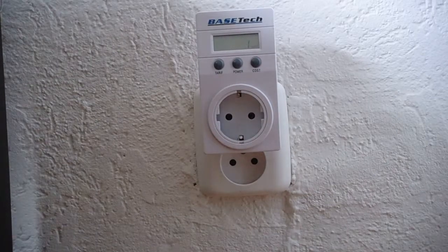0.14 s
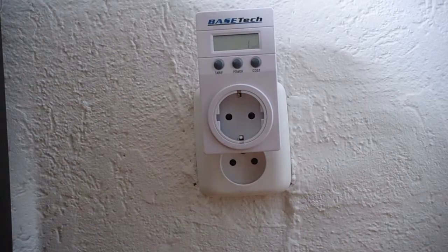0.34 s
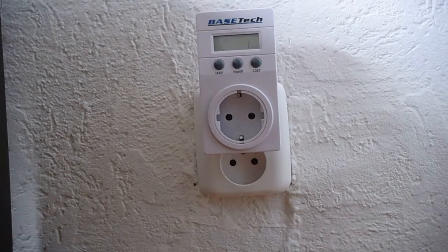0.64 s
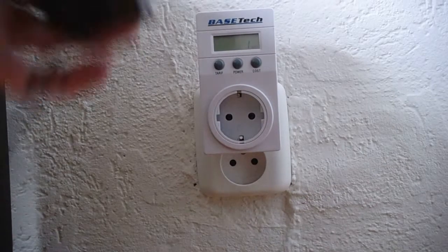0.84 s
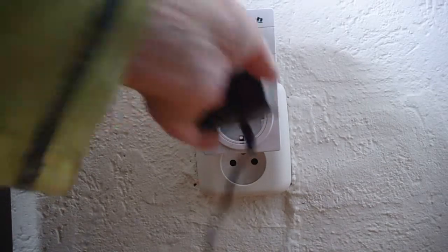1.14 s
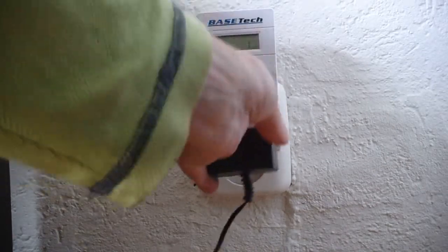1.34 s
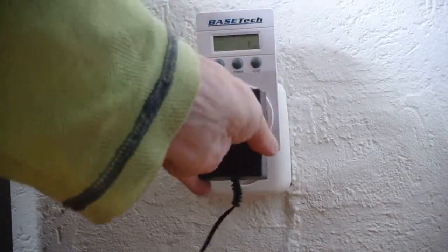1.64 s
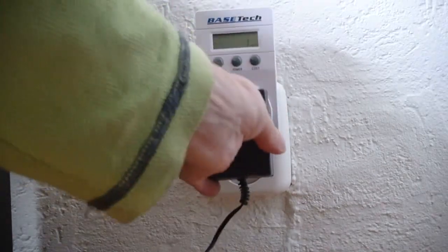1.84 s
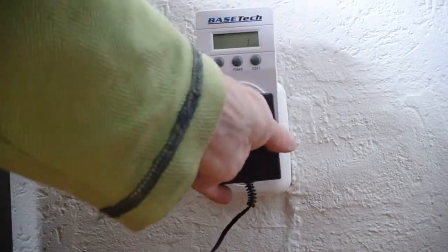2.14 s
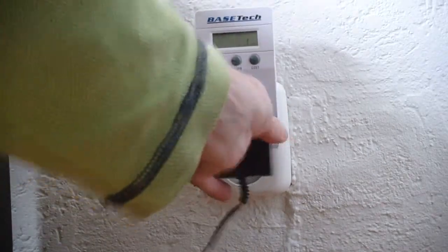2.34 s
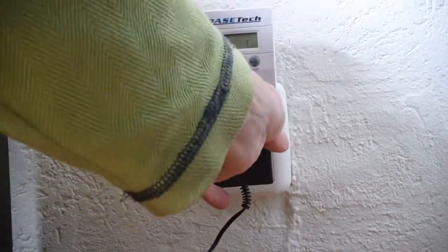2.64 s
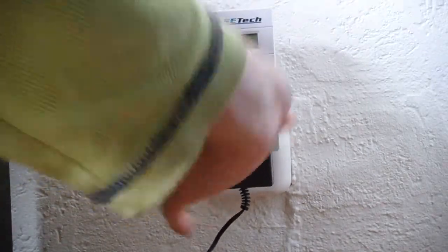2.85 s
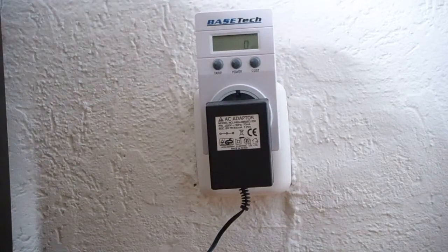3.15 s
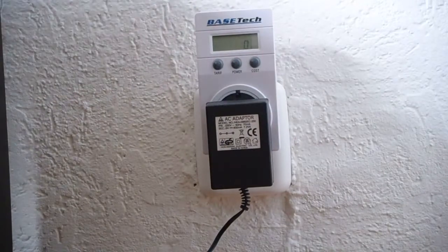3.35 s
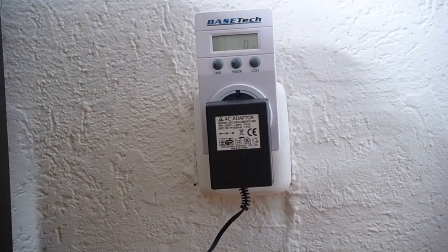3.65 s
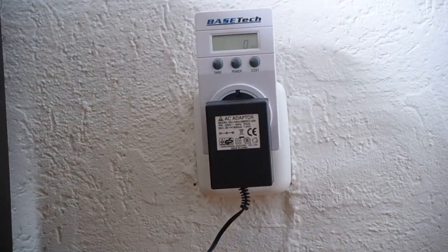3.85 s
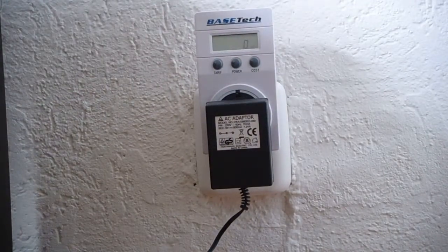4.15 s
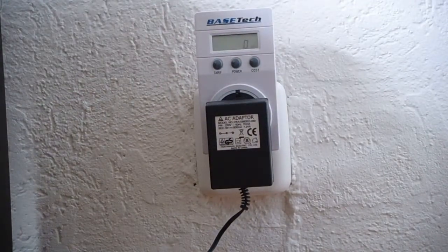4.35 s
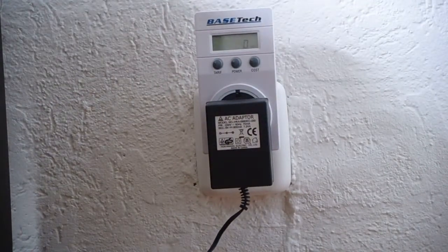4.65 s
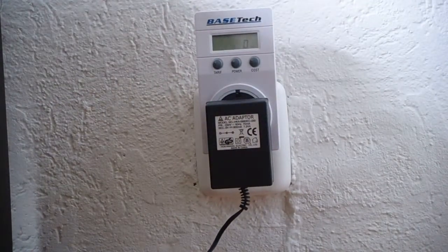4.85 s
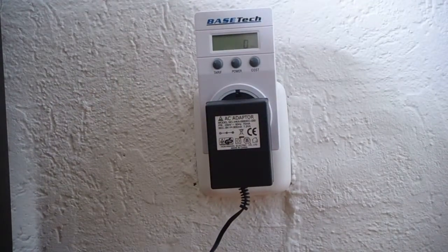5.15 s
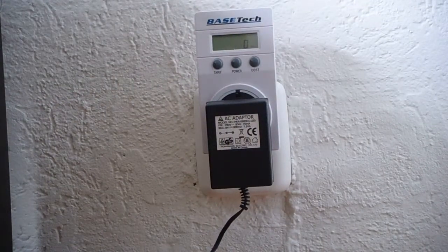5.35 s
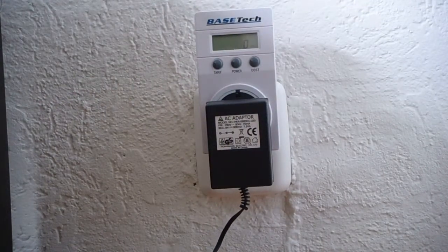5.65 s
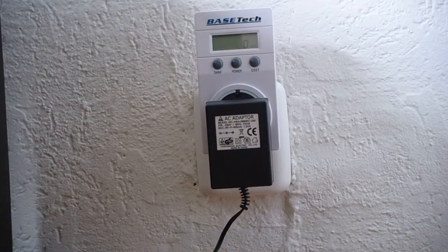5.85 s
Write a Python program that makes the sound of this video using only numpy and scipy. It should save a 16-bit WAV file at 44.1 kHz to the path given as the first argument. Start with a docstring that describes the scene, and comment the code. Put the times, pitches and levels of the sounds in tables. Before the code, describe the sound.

A small room with a short tail, recorded close by two microphones over steady soft rumble and hiss. Cloth rubs gently from the start; at 0.3 to 0.5 s come plastic clicks, the sharpest at 0.4, with a low thud beneath. Lighter, brighter clicks and sleeve rustle run from 0.8 to 1.4 s. At 1.6 s the plug scrapes briefly into the socket, with small clicks after it; at about 2.35 s a stronger double crunch seats it. Two small high clicks follow at 2.76 s, then near quiet. From 3.3 s there are faint clicks, with dull thuds around 3.8 to 4.3 s, soft rubbing and tiny creaks. A finger taps the camera at 4.8 s and more weakly near 5.3 s. Around 5.45 s something slides in groaning, hissing jerks. From 5.78 s a hard object is put down nearby: light touches, loud woody clacks at 5.84 s, smaller knocks and a fading rattle.

```python
"""Small room, close to the camera: a sleeve rubs (noise of tiny slips), a gripped plastic power adapter creaks and
clicks (noise bursts, ringing modes), a footstep thuds (low modes), two stick-slip scrapes push it into a wall socket.
Then more thuds, fingers tapping the camera (tick and case modes), a slide in jerks (groan and hiss), and nearby a
hard object put down with knocks (clack, crack, board modes) and a rattle (decaying random ticks).
Throughout, two closely spaced microphones hear the room's tail and rumble over their own hiss (filtered noise)."""
import sys
import numpy as np
from scipy import signal
from scipy.fft import rfft, irfft
from scipy.io import wavfile

SR = 44100
rng = np.random.default_rng(int(sys.argv[2]) if len(sys.argv) > 2 else 0)


def log_audio(samples):
    """Write samples as a 16-bit WAV file to the path given in sys.argv[1]."""
    # one column per channel
    frames = np.atleast_2d(samples).T
    # limit to full scale, then quantise
    limited = np.clip(frames, -1, 1)
    pcm = np.round(limited * 32767).astype(np.int16)
    wavfile.write(sys.argv[1], SR, pcm)


N = 264600
TIME = np.arange(N) / SR  # s from the start of the scene
AGE = TIME[:SR // 2]  # s from the start of one sound


def undb(db):
    """Decibels to amplitude gain."""
    return 10 ** (np.asarray(db) / 20)


def unit(x):
    """Scale to rms 1."""
    return x / np.sqrt(np.mean(x ** 2))


def onset_level(x, db):
    """Scale a hit so that its first hundredth of a second has this rms level."""
    onset_rms = np.sqrt(np.mean(x[:SR // 100] ** 2))
    return x * undb(db) / onset_rms


def add(track, s, sound):
    """Mix a sound in at a time in seconds."""
    i = int(s * SR)
    track[i:i + len(sound)] += sound[:N - i]


def filt(x, hz, kind, order=2):
    """Butterworth filter."""
    return signal.sosfilt(signal.butter(order, hz, kind, fs=SR, output="sos"), x)


def colour(x, points, size=2048):
    """Causal filter with a (f/Hz, level/dB) response, built from its cepstrum."""
    hz, db = np.transpose(points)
    bins_hz = np.arange(size // 2 + 1) * SR / size
    gain = undb(np.interp(np.log(bins_hz + 1), np.log(hz), db))
    cepstrum = irfft(np.log(gain))
    # folding the cepstrum gives minimum phase
    cepstrum[1:size // 2] *= 2
    cepstrum[size // 2 + 1:] = 0
    impulse = irfft(np.exp(rfft(cepstrum)))
    return signal.fftconvolve(x, impulse)[:len(x)]


def fade(t60):
    """Exponential decay by 60 dB in t60 seconds."""
    return np.exp(-np.log(1000) * AGE / t60)


def burst(t60):
    """A dense cluster of short modes: decaying noise."""
    return rng.standard_normal(len(AGE)) * fade(t60)


def ring(modes, scatter_db=2):
    """Damped modes; each point of contact gives them other phases and strengths."""
    out = np.zeros(len(AGE))
    for hz, db, t60 in modes:
        strength = undb(db + scatter_db * rng.standard_normal())
        out += strength * fade(t60) * np.sin(2 * np.pi * (hz * AGE + rng.random()))
    return out


def grate(slips, t60):
    """Every slip releases its own brief burst of noise; overlapping bursts add in power."""
    power = signal.lfilter([1], [1, -fade(t60)[1] ** 2], slips ** 2 + 1e-18)
    return np.sqrt(power) * rng.standard_normal(len(slips))


def friction(points, rate, spread_db, flutter_db):
    """Many tiny slips (rate per s) of uneven size, coming in flurries; rms 1."""
    sizes = undb(spread_db * np.minimum(rng.exponential(size=N), 4))
    slips = (rng.random(N) < rate / SR) * sizes
    knots = np.linspace(0, TIME[-1], 300)
    flurry = np.interp(TIME, knots, rng.standard_normal(len(knots)))
    noise = grate(slips * undb(flutter_db * flurry), t60=.004)
    return unit(colour(noise, points))


def strokes(rows):
    """Two layers' gains: each stroke swells and dies away exponentially; overlapping strokes add in power."""
    power = np.zeros((2, N))
    for s, rise_s, fall_s, low_db, hiss_db in rows:
        shape = undb(-20 * np.maximum((s - TIME) / rise_s, (TIME - s) / fall_s))
        power += np.outer(undb([low_db, hiss_db]), shape) ** 2
    return np.sqrt(power)


# prongs scraping in the contacts: [t/s, duration/s, level/dB, grit re shell/dB, swell while pushing/dB]
PRONG_PUSHES = [(1.5855, 0.01773, -28.5, -2, 3), (1.612, .037, -42.5, -5.5, -9.5),
                (2.346, 0.014334, -30.5, -1, 25.5), (2.3587, .013, -21.5, -1, -1),
                (2.3749, 0.012318, -21, 3.5, -3)]
# adapter shell and socket, damped by the hand: [f/Hz, relative level/dB, t60/s]
SHELL_MODES = [(926.94, -13, 0.03774), (1217.3, -22, 0.02327), (2054.5, -2.5, 0.03433),
               (2310, -5.5, 0.0593), (2714, -1.5, 0.03193), (2932.3, -0.5, 0.0245), (3107.3, -0.5, 0.02465),
               (3317.7, 2, 0.0215), (3952.1, -1.5, 0.01591)]
# colour of the scraping: [f/Hz, level/dB]
SCRAPE_COLOUR = [(60, -50), (150, -6.5), (300, -9.5), (550, -8.5), (1050, -6), (1600, -14), (2150, -4.5),
                 (3300, -1), (4600, -6), (7000, -10.5), (11000, -11.5), (15000, -19)]


def pushes(slip_rate=900, slip_db=2, grit_t60=0.010754):
    """The prongs stick and slip in the spring contacts; every slip grates and rings the shell from a new spot."""
    out = np.zeros(N)
    for s, duration, db, grit_db, swell_db in PRONG_PUSHES:
        count = max(int(duration * slip_rate), 2)
        progress = (np.arange(count) + rng.random(count)) / count
        sizes = undb(swell_db * progress + slip_db * rng.standard_normal(count))
        slips, shell = np.zeros(len(AGE)), np.zeros(len(AGE))
        for i, size in zip((progress * duration * SR).astype(int), sizes):
            slips[i] = size
            shell[i:] += size * ring(SHELL_MODES)[:len(AGE) - i]
        grit = unit(colour(grate(slips, grit_t60), SCRAPE_COLOUR))
        scrape = unit(shell) + undb(grit_db) * grit
        add(out, s, scrape * undb(db) / np.std(scrape[:int(duration * SR)]))
    return out


# distinct clicks: mostly plastic and cable, and a catch in the slide at 5.48 s:
# [t/s, level at 1.8-5 kHz/dB, body re level/dB, crack re level/dB,
# contact t60/s, ping of the touched part f/Hz, ping re contact/dB]
DISTINCT_CLICKS = [(.302, -50.5, 8, -10.5, 0.03874, 1494, -4.5),
                   (.327, -39, -2, -10.5, 0.05186, 1084, -11.5),
                   (.4055, -24.5, -7.5, -13, 0.02873, 1395, -10),
                   (0.4781, -31, -.5, -1.5, 0.02493, 1211, -13),
                   (0.7971, -45, -9.5, -12, 0.0678, 3206, -7.5), (.821, -43.5, -19, -7, 0.0747, 3949, -3),
                   (0.8565, -49.5, -10.5, 0, 0.0301, 4056, 0), (.9676, -35, -12.5, 8, 0.02524, 3247, 0),
                   (0.9954, -37.5, -5, -6, 0.02401, 2525, -17), (1.167, -42.5, 0, 7, 0.058, 1172, -4),
                   (1.1869, -30, -10, -7, 0.00663, 3676, -6.5), (1.197, -51.5, 14, 6, 0.0777, 629.9, -9),
                   (1.376, -51, -5.5, 7, 0.0378, 4349, 7), (1.6838, -44, -3, -5, 0.02783, 2212, -9),
                   (1.7253, -50, -10, 1, 0.02643, 5170, -3.5),
                   (1.7986, -42.5, -12.5, -2, 0.04944, 2553, -12.5),
                   (1.8186, -46.5, -21.5, -11, 0.0569, 3476, -11),
                   (1.8567, -50.5, -1.5, -2.5, 0.0373, 3744, -4.5),
                   (2.756, -45, -11.5, -2.5, 0.03909, 5291, -13),
                   (2.7693, -35.5, -12.5, 2.5, 0.0257, 5400, -2),
                   (3.3427, -55, 2.5, -13, 0.0469, 2024, -12.5),
                   (3.4984, -48, 5.5, -11, 0.06805, 962.6, -13.5), (3.762, -48, 3, -3, 0.1047, 969.6, -3),
                   (3.7786, -42, -1, 0, 0.03332, 507.7, -11.5),
                   (3.8353, -45, -3.5, -13.5, 0.03303, 2160, -11),
                   (3.9051, -45, 3.5, -2, 0.03223, 550.1, -3), (3.9959, -50, 6.5, -3, 0.0255, 868.1, -9.5),
                   (4.575, -43, -8, -8.5, 0.02784, 3823, -8), (4.744, -46, -10.5, 4, 0.01468, 5395, -15),
                   (5.01, -47.5, -4, -5, 0.0602, 1911, 3), (5.4794, -40.5, -3.5, 1, 0.1113, 1226, -12.5)]
# colour of a plastic contact: [f/Hz, level/dB]
CONTACT_COLOUR = [(200, -9), (650, -7.5), (1200, -0.5), (2600, 0.5), (4000, -3), (5500, -1), (7500, -2),
                  (14000, -1.5)]
# edges of the body, middle and crack bands: [f/Hz]
CLICK_BANDS = (130, 1800, 5000, 15000)


def clicks(shell_db=-10, ping_t60=0.02072, ping_spread=0.04652):
    """Each contact cracks, pings the touched part and rings the shell; each row sets its own body and crack levels."""
    out = np.zeros(N)
    for s, db, body_db, crack_db, t60, ping_hz, ping_db in DISTINCT_CLICKS:
        contact = onset_level(colour(burst(t60), CONTACT_COLOUR), 0)
        # the touched part rings with a tight cluster of modes
        cluster = [(ping_hz * (1 + ping_spread * k), -3 * abs(k), ping_t60) for k in (-1, 0, 1)]
        ping = onset_level(ring(cluster), ping_db)
        hit = contact + onset_level(ring(SHELL_MODES), shell_db) + ping
        for lo, hi, band_db in zip(CLICK_BANDS, CLICK_BANDS[1:], (body_db, 0, crack_db)):
            band = filt(hit, (lo, hi), "bandpass", order=3)
            add(out, s, onset_level(band, db + band_db))
    return out


# spells of faint creaking from the grip and the cable: [start t/s, end t/s, ticks per s, level/dB]
CREAK_SPELLS = [(.05, .29, 23.244, -54), (1.92, 2.08, 25.815, -55), (4.029, 4.55, 18, -55.5),
                (4.9, 5.26, 28, -51.5), (5.012, 5.07, 110.3, -49.5)]
# colour of a creak: [f/Hz, level/dB]
CREAK_COLOUR = [(300, -23.5), (1000, -9), (1500, -2.5), (1950, 2), (2500, -3.5), (4000, -12),
                (10000, -29.5)]


def creaks(t60=0.039, spread_db=3.0):
    """Held plastic gives way in small dull ticks, unevenly spaced and of uneven size."""
    out = np.zeros(N)
    for start, end, rate, db in CREAK_SPELLS:
        count = max(int((end - start) * rate), 1)
        for k in range(count):
            tick_db = db + spread_db * rng.standard_normal()
            tick = onset_level(colour(burst(t60), CREAK_COLOUR), tick_db)
            add(out, start + (end - start) * (k + rng.random()) / count, tick)
    return out


# the hard object touches, lands and rocks: [t/s, level/dB, brightness/dB, board ring/dB], last two re level
OBJECT_KNOCKS = [(5.783, -27.5, 11, -13), (5.7882, -33.5, 0, 0.5), (5.805, -41, 11, -14.5),
                 (5.8416, -15, -15, -6), (5.8466, -14.5, -22, -3), (5.8499, -16, -12, -5),
                 (5.8633, -31, 11.5, -20), (5.871, -30, 4, -12), (5.902, -22, -17, -3),
                 (5.9222, -27.5, -12, -9.5)]
# the object and the board under it: [f/Hz, relative level/dB, t60/s]
BOARD_MODES = [(214.66, -9, 0.2862), (293, 0, 0.08283), (319.28, -4, 0.1676), (571, -6.5, 0.1699),
               (746, 0, 0.2118), (946.83, -7, 0.2546), (1031.3, 3, .2), (1162, -6.5, 0.1972),
               (1214.7, -11.5, 0.25), (1405, 11, 0.05143), (1383.3, -5, 0.1963), (1503.2, -12.5, 0.1653),
               (1740, 8, .06), (1769, -3.5, 0.1474), (2010.5, -1.5, 0.1245), (2084.6, -2, 0.1168),
               (2730.1, -7, 0.158), (2933, -12, 0.1457), (3073, -14, 0.1857), (3299.2, -14.5, 0.1813)]
# the blow itself: [f/Hz, level/dB]
BLOW_COLOUR = [(130, -48.5), (220, -19), (320, -11), (470, -16.5), (720, -6), (950, 0), (1400, -3),
               (2050, -1), (2500, -11.5), (3300, -10), (4200, -23.5), (7500, -19), (14000, -36)]
# crack of the hard object's edges: [f/Hz, level/dB]
EDGE_COLOUR = [(1000, -28.5), (2400, 1), (3300, 2), (4500, 0.5), (7000, -13.5), (10000, -13),
               (15000, -21.5)]


def knocks(blow_t60=0.04064, crack_db=-14, crack_t60=0.147):
    """Each blow is a short clack over the longer modes of the board; hard edges add a crack."""
    out = np.zeros(N)
    for s, db, bright_db, ring_db in OBJECT_KNOCKS:
        clack = onset_level(colour(burst(blow_t60), BLOW_COLOUR), -0.3637)
        crack = onset_level(colour(burst(crack_t60), EDGE_COLOUR), crack_db + bright_db)
        board = onset_level(ring(BOARD_MODES, scatter_db=1), ring_db)
        add(out, s, undb(db) * (clack + crack + board))
    return out


def rattle(db, start_s=5.856, rate=260, settle_t60=0.3808):
    """Loose parts chatter ever more weakly after the object has landed (rate in ticks per s)."""
    sizes = undb(3 * rng.standard_normal(len(AGE))) * fade(settle_t60)
    ticks = (rng.random(len(AGE)) < rate / SR) * sizes
    chatter = grate(ticks, t60=.008)
    chatter = unit(colour(chatter, BLOW_COLOUR)) + unit(colour(chatter, EDGE_COLOUR))
    out = np.zeros(N)
    add(out, start_s, chatter * undb(db) / np.std(chatter[:SR // 20]))
    return out


# finger taps on the camera: [t/s, case level/dB, brightness of the tick/dB]
FINGER_TAPS = [(4.8002, -25, 6), (5.2654, -33.5, 0), (5.3401, -42.5, 9)]
# camera case: [f/Hz, relative level/dB, t60/s]
CASE_MODES = [(372.57, -15.5, 0.06425), (727.92, -4.5, 0.04538), (994.8, 3, 0.008476),
              (1334.3, -5, 0.01416), (1657, 2.5, 0.01093), (1835.2, 1.5, 0.01963), (3222.6, -7, 0.01173),
              (6692, -13, 0.01303), (10462, -21.5, 0.01367), (13390, -15, 0.02435)]


def taps(crack_db=-9, flex_s=.001, clack_db=-7):
    """A sharp tick, then the camera case flexes and rings very briefly."""
    out = np.zeros(N)
    for s, db, bright_db in FINGER_TAPS:
        tick = filt(burst(0.01594), 1050, "highpass", order=1)
        add(out, s, onset_level(tick, db + bright_db + crack_db))
        clack = filt(burst(0.03001), (600, 2200), "bandpass")
        case = ring(CASE_MODES, scatter_db=1)
        add(out, s + flex_s, onset_level(case, db) + onset_level(clack, db + clack_db))
    return out


# something slides over the board in jerks: [peak t/s, rise by 20 dB/s, fall by 20 dB/s, groan/dB, hiss/dB]
SLIDE_JERKS = [(5.415, 0.2192, 0.0809, -46, -62.5), (5.461, 0.0195, 0.0186, -32.5, -46),
               (5.487, 0.0253, 0.0309, -31.5, -41.5), (5.55, 0.1094, 0.1562, -46.5, -50.5),
               (5.635, 0.0991, 0.1247, -51.5, -43.5)]
# colour of the groaning board: [f/Hz, level/dB]
GROAN_COLOUR = [(150, -12), (500, -4), (850, -3.5), (1150, 3.5), (1600, -6), (3000, -17.5), (6000, -34.5)]
# colour of the hissing edge: [f/Hz, level/dB]
GRIT_COLOUR = [(1000, -37), (2500, 3), (4200, 7.5), (6000, -0.5), (10000, -7), (15000, -14)]


def slide():
    """A dragged object makes the board groan while its edge hisses."""
    groan, hiss = strokes(SLIDE_JERKS)
    board = friction(GROAN_COLOUR, rate=1200, spread_db=2, flutter_db=1.5)
    edge = friction(GRIT_COLOUR, rate=4000, spread_db=2.5, flutter_db=1)
    return groan * board + hiss * edge


# dull thuds through floor and furniture: [t/s, level of the low mode/dB, pitch f/Hz, t60/s]
DULL_THUDS = [(.353, -29, 102.9, 0.2805), (3.763, -33, 251, 0.158), (3.778, -25.5, 175.3, 0.18652),
              (3.783, -26, 118.2, 0.2202), (3.903, -40, 299.9, 0.04113), (4.003, -36.5, 111.4, 0.077),
              (4.284, -45, 120.2, 0.2191)]


def thuds(overtone_db=-12, overtone_ratio=1.8, rumble_db=-8.5, push_s=0.004044):
    """Soft heavy contacts build over a few milliseconds: one low mode, a weaker overtone and a dull rumble."""
    out = np.zeros(N)
    for s, db, hz, t60 in DULL_THUDS:
        low = np.sin(2 * np.pi * hz * AGE)
        overtone = undb(overtone_db) * np.sin(2 * np.pi * overtone_ratio * hz * AGE)
        rumble = unit(filt(rng.standard_normal(len(AGE)), (hz / 1.6, hz * 1.7), "bandpass"))
        envelope = fade(t60) * np.minimum(AGE / push_s, 1)
        add(out, s, undb(db) * (low + overtone + undb(rumble_db) * rumble) * envelope)
    return out


# strokes of the sleeve and cable, levels before the trims below:
# [peak t/s, rise by 20 dB/s, fall by 20 dB/s, rub/dB, hiss/dB]
SLEEVE_STROKES = [(.22, 1.24, 0.8528, -50, -60.5), (.45, 0.1059, 0.3692, -51, -50.5),
                  (.8, 0.8258, 0.4982, -53.5, -69.5), (1.03, 0.0881, 0.1839, -48.5, -46.5),
                  (1.19, 0.1339, 0.1993, -42, -43), (1.3, 0.1931, 0.6583, -48, -56),
                  (1.85, 0.1639, 0.1452, -63.5, -55), (3.5, 0.1, 0.072, -50.5, -61),
                  (3.8, 0.0723, .27, -45, -51.5), (3.905, 0.0923, 0.1515, -48, -52.5),
                  (4.15, 0.2721, 0.0024, -50, -66.5), (4.27, 0.0826, 0.1021, -48.5, -60),
                  (4.6, 0.3172, .5, -53.5, -48), (4.8, 0.2087, 0.2214, -53, -47),
                  (5.025, 0.1634, 0.2447, -49.5, -54)]
# colour of the rubbing cloth: [f/Hz, level/dB]
RUB_COLOUR = [(150, -11.5), (400, -12), (800, -1.5), (1400, 1), (2200, -1.5), (4000, -10), (8000, -21)]
# colour of the hissing fibres: [f/Hz, level/dB]
FIBRE_COLOUR = [(1500, 2), (4000, 2.5), (8000, -4.5), (14000, -11)]


def sleeve(rub_trim_db=-1, hiss_trim_db=-1):
    """Cloth and cable rub as the arm moves: many small slips, more of them in the fibres."""
    rub, hiss = strokes(SLEEVE_STROKES)
    cloth = friction(RUB_COLOUR, rate=2200, spread_db=3, flutter_db=2.5)
    fibres = friction(FIBRE_COLOUR, rate=6000, spread_db=2.5, flutter_db=1.5)
    return undb(rub_trim_db) * rub * cloth + undb(hiss_trim_db) * hiss * fibres


def room(x, wet_db=-10.0, t60_low=0.304, t60_high=0.25534, split_hz=3200, apart_hz=6200,
         spread=0.1583, build_s=0.003856):
    """Small-room tail; it differs between the microphones mainly in the treble."""
    def tail():
        """Noise of dense reflections with a shorter treble decay; energy 1."""
        low = filt(burst(t60_low), split_hz, "lowpass")
        high = 1.1169 * filt(burst(t60_high), split_hz, "highpass")
        reflections = (low + high) * np.clip(AGE / build_s - .5, 0, 1)
        return reflections / np.sqrt(np.sum(reflections ** 2))
    mid = tail()
    side = spread * tail() + filt(tail(), apart_hz, "highpass", order=1)
    pair = [signal.fftconvolve(x, ir)[:N] for ir in (mid + side, mid - side)]
    return undb(wet_db) * np.array(pair)


def microphones(x, lag_samples=0.576, scatter_db=-5, scatter_hz=8000):
    """Sound reaches the left port later, weaker and brighter; the case scatters treble between the ports."""
    hz = np.arange(N // 2 + 1) * SR / N
    # half of the left-to-right level difference goes to each port
    balance = undb(np.interp(hz, (2000, 7000, 13000), (-1.7, 0, 2)) / 2)
    lag = np.exp(-2j * np.pi * hz * lag_samples / SR)
    left = irfft(rfft(x[0]) * balance * lag, N)
    right = irfft(rfft(x[1]) / balance, N)
    echo = burst(0.00605)
    echo /= np.sqrt(np.sum(echo ** 2))
    side = undb(scatter_db) * signal.fftconvolve(filt(right, scatter_hz, "highpass"), echo)[:N]
    return np.array([left + side, right - side])


# colour of room rumble and microphone hiss: [f/Hz, relative density/dB per Hz]
FLOOR_COLOUR = [(15, -65.5), (25, -60.5), (44, -6.5), (113, -3), (147, -9), (264, -6.5), (414, -11),
                (472, -11), (722, -12), (1230, -13.5), (2250, -17), (3180, -18.5), (14000, -23.5)]


def floor(shared_hz=450, level_db=-52):
    """Room rumble is common to both microphones; each has its own hiss."""
    rumble = filt(rng.standard_normal(N), shared_hz, "lowpass")
    own = filt(rng.standard_normal((2, N)), shared_hz, "highpass") + 1.7042 * rng.standard_normal((2, N))
    pair = [unit(colour(rumble + hiss, FLOOR_COLOUR, size=8192)) for hiss in own]
    return undb(level_db) * np.array(pair)


def scene():
    """Airborne sounds excite the room; taps come mostly through the case; knocks and taps are kept free of deep bass."""
    near = pushes() + clicks() + creaks() + slide() + thuds() + sleeve()
    far = filt(knocks() + rattle(db=-31.5), 151.9, "highpass", order=3)
    case = filt(taps(), 205.9, "highpass")
    tail = room(near + undb(4.5) * far + undb(-8.5) * case)
    air = filt(near + far + tail, 43, "highpass")
    return microphones(air) + case + floor()


def record(dry):
    """The sound clips at full scale and holds nothing above 14.4 kHz."""
    low_pass = signal.ellip(8, .2, 60, 14400, fs=SR, output="sos")
    return signal.sosfilt(low_pass, np.clip(dry, -1, 1))


dry = scene()
out = record(dry)
log_audio(out)
```